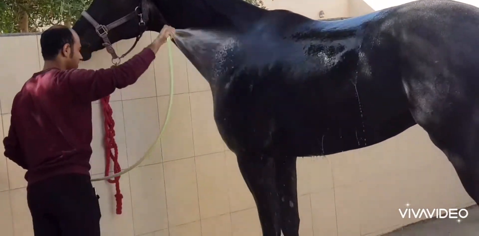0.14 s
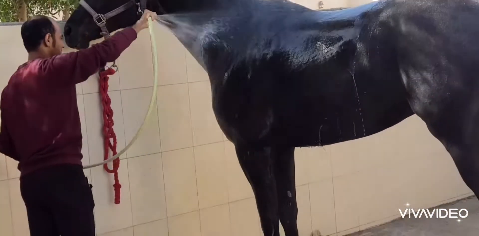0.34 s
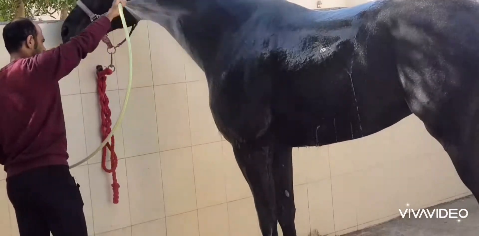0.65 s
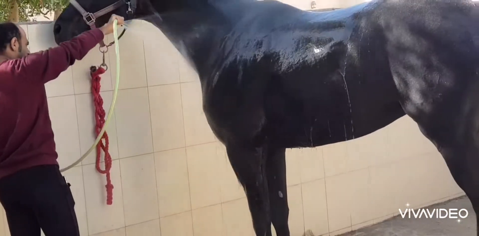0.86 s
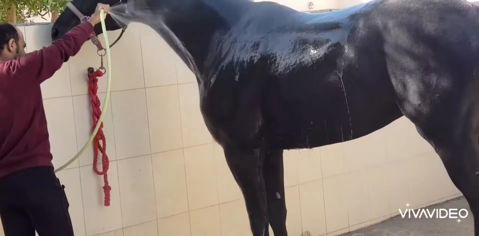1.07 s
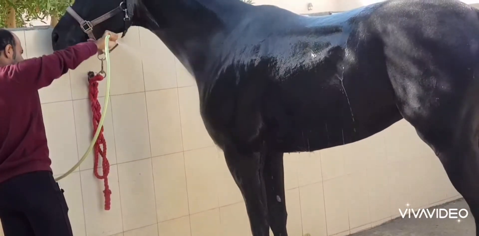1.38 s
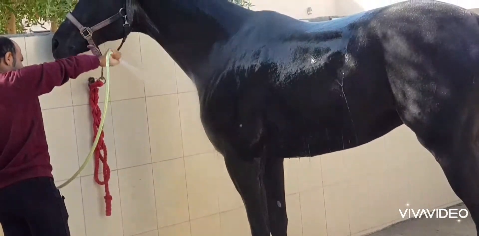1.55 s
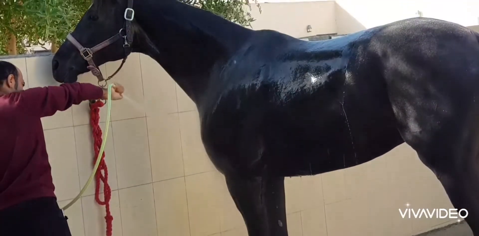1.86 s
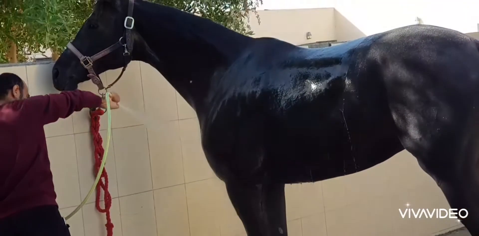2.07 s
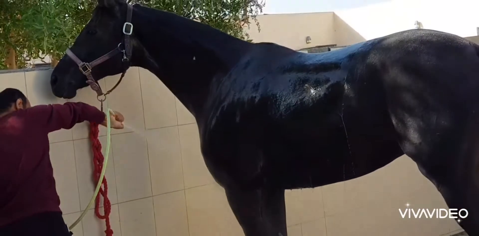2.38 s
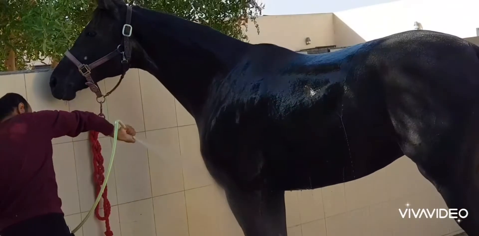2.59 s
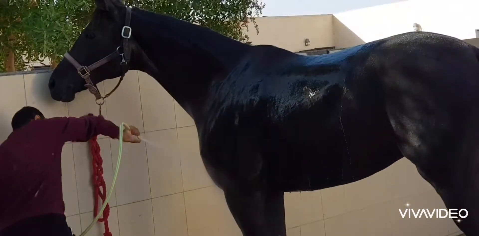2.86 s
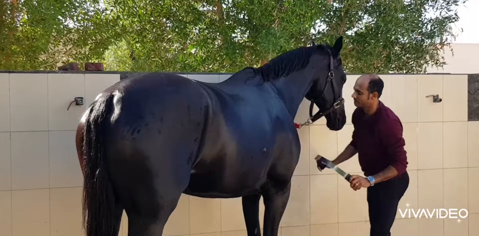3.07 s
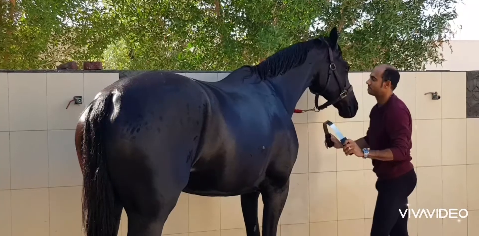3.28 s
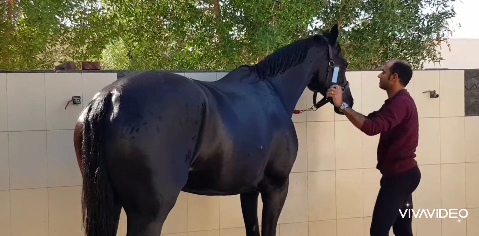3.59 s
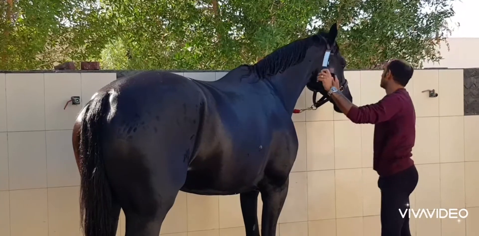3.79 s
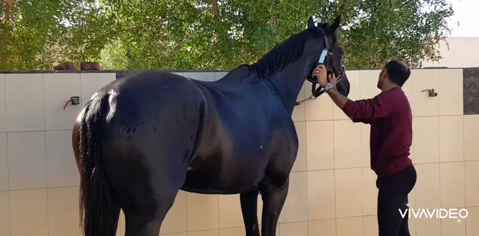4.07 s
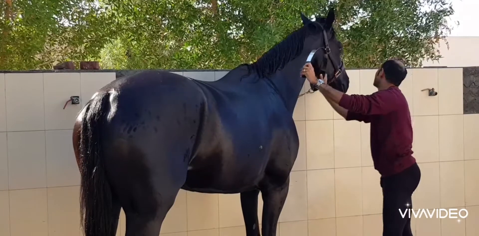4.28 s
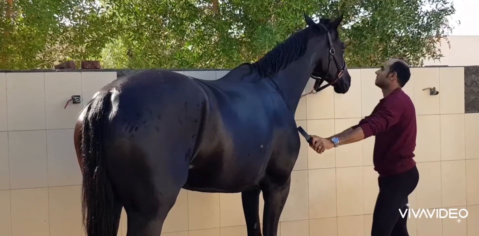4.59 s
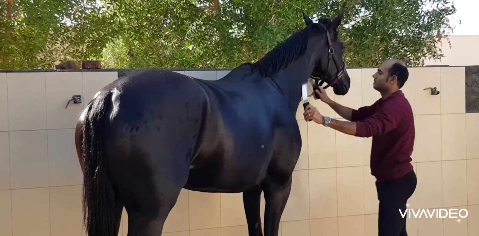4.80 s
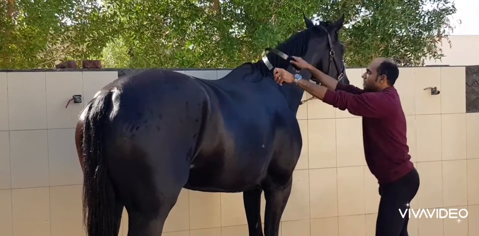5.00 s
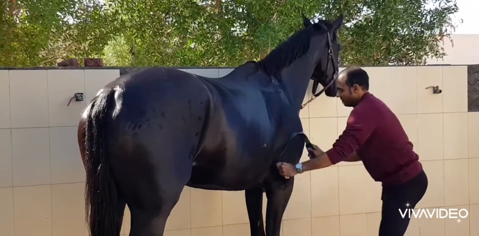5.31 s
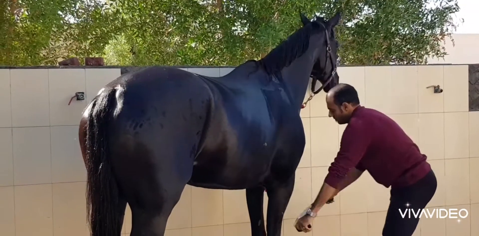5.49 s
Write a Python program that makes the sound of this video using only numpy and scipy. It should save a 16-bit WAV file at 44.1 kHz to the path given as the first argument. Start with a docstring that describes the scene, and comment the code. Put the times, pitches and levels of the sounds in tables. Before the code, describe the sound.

A low hum and soft rumble lie beneath thin air noise and very faint rustling throughout. At 0 s a quick cluster of dull knocks sounds, with weaker taps near 0.2 and 0.5 s. From about 0.5 s a horse gives a rough, low, fluttering nicker with breathy nostril puffs and sharp throat catches near 1.1 and 1.2 s. The voice thins around 1.4 s with a faint nasal whistle, then climbs from 1.6 s into a high, wavering squeal, strongest near 2.1 s, falling away by 2.3 s. A quiet gap follows, with light dry taps around 2.7, 3.2-3.5, 4.0 and 4.5 s. A clearer double knock at 5.15 s precedes a louder, pulsing nicker from 5.25 s, with a raspy higher voice above and a hard catch near 5.45 s, continuing to the end. A hard wall adds one close echo; the yard tail is short.

```python
"""Horse calling in a washing yard

A tethered horse calls twice beside a tiled wall. Its first call is a rough nicker (pulses and breath noise
through throat resonances) that climbs into a wavering squeal (a harmonic series with rasp); the second is a
loud, pulsing nicker with a high voice above it. Light knocks of hooves, halter and grooming tool (filtered
impulses with a noisy ring) fall mostly before and between them, over a low hum, rumble, air and rustling.
The wall gives the voice one close echo; the yard adds a short tail."""
import sys
import numpy as np
from scipy import signal
from scipy.fft import rfft, irfft
from scipy.io import wavfile
from scipy.ndimage import uniform_filter1d, map_coordinates

SR = 44100
rng = np.random.default_rng(int(sys.argv[2]) if len(sys.argv) > 2 else 0)


def waveform_to_disk(signal):
    """Save audio, clipped to [-1, 1], as 16-bit WAV at the path in sys.argv[1]."""
    frames = np.transpose(np.atleast_2d(signal))
    scaled = np.clip(frames, -1, 1) * 32767
    samples = np.round(scaled).astype(np.int16)
    wavfile.write(sys.argv[1], SR, samples)


N = 249165
TIME = np.arange(N) / SR  # seconds


def gain_of(db):
    """Amplitude ratio: 20 dB for each factor of ten."""
    return 10 ** (np.asarray(db) / 20)


def evened(x):
    """Normalisation: scales a signal to rms 1."""
    return x / np.sqrt(np.mean(x ** 2) + 1e-20)


def read(points, hz):
    """Spectral envelope: levels in dB joined by straight lines on a log-frequency axis."""
    f, db = np.transpose(points)
    return np.interp(np.log(hz + 1), np.log(f), db)


def follow(rows, t):
    """Linear interpolation: each column of a curve table at the times t."""
    s, *columns = np.transpose(rows)
    return [np.interp(t, s, c) for c in columns]


def add(mix, s, sound):
    """Superposition: mixes a sound in at s seconds."""
    part = mix[max(round(s * SR), 0):][:len(sound)]
    part += sound[:len(part)]


def colour(x, points):
    """Linear filtering: shapes x by a spectral envelope, to rms 1."""
    hz = np.fft.rfftfreq(len(x), 1 / SR)
    return evened(irfft(rfft(x) * gain_of(read(points, hz)), len(x)))


def band(x, low_hz, high_hz):
    """Band limitation: a steep zero-phase band-pass, to rms 1."""
    hz = np.fft.rfftfreq(len(x), 1 / SR) + 1
    loss = np.sqrt((1 + (low_hz / hz) ** 20) * (1 + (hz / high_hz) ** 20))
    return evened(irfft(rfft(x) / loss, len(x)))


def wander(size, hz):
    """Random modulation: band-limited noise of rms 1, from a tenth of hz up to hz."""
    return band(rng.standard_normal(size), hz / 10, hz)


def causal(db):
    """Minimum phase: the most compact causal pulse with this spectrum, its range limited to 80 dB."""
    log_gain = np.log(gain_of(np.maximum(db, db.max() - 80)))
    circle = np.r_[log_gain, log_gain[-2:0:-1]]
    return np.fft.ifft(np.exp(np.conj(signal.hilbert(circle)))).real


def bump(t, s, half_s):
    """Gaussian envelope: a smooth swell from 0 to 1 and back, centred on s."""
    return np.exp(-((t - s) / half_s) ** 2)


def swells(rows, t):
    """Superposed Gaussian envelopes: the gain of a table of smooth swells at the times t."""
    return sum(gain_of(db) * bump(t, s, half_s) for s, half_s, db in rows)


def hum_and_whine():
    """Frequency and amplitude modulation: steady tones drift slightly in pitch and level."""
    drift_hz, swell_db = 3, 1.5  # rms
    # A low hum and a faint whine. Each row: frequency in hertz, level in dB.
    tones = [(89, -62), (4280, -94.5)]
    mix = np.zeros(N)
    for hz, db in tones:
        swell = gain_of(swell_db * wander(N, 7.6))
        turns = np.cumsum(hz + drift_hz * wander(N, 11.7)) / SR
        mix += gain_of(db) * evened(swell * np.sin(2 * np.pi * turns))
    return mix


def background(rustle_db=-4.0):
    """Filtered noise: rumble, still air, high hiss and soft rustling, together with the hum and whine."""
    rumble_db, rumble_swell_db, rumble_swell_hz = -60, -0.36, 5.5
    air_db = -81
    # Spectrum of the low rumble. Each row: frequency in hertz, relative level in dB.
    rumble_spectrum = [(20, -29.5), (45, -12), (70, -5), (88, 2.5), (125, -0.5), (170, -7), (240, -8),
                       (320, -15), (450, -25.5), (900, -41.5)]
    # Spectrum of the still air. Each row: frequency in hertz, relative level in dB.
    air_spectrum = [(150, -4.5), (300, -6), (500, -3.5), (900, -6.5), (1400, -19.5), (1900, -13.5),
                    (2800, -12.5), (3400, -14), (8000, -21.5), (15500, -48)]
    # Spectrum of the rustle. Each row: frequency in hertz, relative level in dB.
    rustle_spectrum = [(300, -10), (600, 9), (1300, 9.5), (2000, 4.5), (2700, 6.5), (3400, -12.5),
                       (6000, -18.5), (11000, -21), (15000, -21)]
    # Faint rustle of water and grooming. Each row: time in seconds, level in dB before rustle_db is added.
    rustle_levels = [(0.0, -76.5), (2.45, -76), (3.3, -74), (3.55, -79), (3.93, -68.5), (4.2, -74.5),
                     (5.1, -76), (5.25, -57)]
    # A faint high hiss swells twice. Each row: peak time in seconds, half-length in seconds, level in dB.
    hiss_swells = [(3.22, 0.29, -79.5), (4.15, 0.23, -86)]

    rumble_gain = gain_of(rumble_db + rumble_swell_db * wander(N, rumble_swell_hz))
    rumble = rumble_gain * colour(rng.standard_normal(N), rumble_spectrum)
    air = gain_of(air_db) * colour(rng.standard_normal(N), air_spectrum)
    rustle_gain = gain_of(follow(rustle_levels, TIME)[0] + rustle_db + 2.2 * wander(N, 40))
    rustle = rustle_gain * colour(rng.standard_normal(N), rustle_spectrum)
    hiss = swells(hiss_swells, TIME) * band(rng.standard_normal(N), 6800, 14060)
    return rumble + hum_and_whine() + air + hiss + rustle


def knock(peak_db, hz, octaves, t60, body, scatter_db):
    """Impulse response: one blow excites a body around hz, with a rattle that decays 60 dB in t60."""
    f = np.fft.rfftfreq(4096, 1 / SR)
    away = np.log2((f + 1) / hz) / max(octaves, .1)
    blow = causal(read(body, f) - 11 * np.log1p(away ** 2))
    decay = gain_of(-60 * np.arange(len(blow)) / SR / max(t60, .003))
    rattle = rng.standard_normal(len(blow)) * decay
    rattle *= gain_of(scatter_db) / np.linalg.norm(rattle)
    rattle[0] += 1  # the blow itself
    sound = signal.fftconvolve(blow, rattle)
    return gain_of(peak_db) * sound / abs(sound).max()


def yard_knocks():
    """Impact excitation: hooves, halter and grooming tool strike bodies of one common colour; the blow at 0.508
    s, as the first call begins, is a sharp catch of the horse's throat."""
    # Each row: start in seconds, peak in dB, centre in hertz, width in octaves, 60 dB ring in seconds. The row
    # at 0.508 s is a catch of the throat at the first call's onset.
    blows = [(0.001, -34.5, 360, 0.86, 0.063), (0.024, -45.5, 660, 0.21, 0.024),
             (0.031, -39.5, 470, 0.47, 0.11), (0.053, -51.5, 730, 0.21, 0.021),
             (0.058, -40.5, 423, 0.89, 0.013), (0.203, -50.5, 356, 0.66, 0.039),
             (0.444, -53, 804, 0.85, 0.043), (0.471, -48.5, 1010, 5.1, 0.17), (0.508, -43, 875, 1.1, 0.11),
             (1.99, -41.5, 259.4, 0.64, 0.016), (2.736, -56.5, 1498, 0.54, 0.095),
             (3.225, -51, 1153, 0.44, 0.15), (3.256, -60, 1010, 0.25, 0.11), (3.342, -45, 282, 0.99, 0.022),
             (3.48, -43.5, 785, 1.4, .028), (3.493, -42, 912, 0.49, 0.037), (3.502, -51, 951, 0.86, 0.016),
             (4.019, -36.5, 691, 0.49, 0.014), (4.028, -43, 234, 0.65, 0.026),
             (4.132, -59, 2550, 0.2, .035), (4.368, -59, 2500, 0.2, 0.073), (4.526, -40, 820, 1.33, 0.03),
             (4.537, -41, 750, 1.5, 0.082), (4.575, -38.5, 940, 0.58, 0.028),
             (4.577, -54, 1940, 0.059, .05), (4.66, -54, 280, 0.21, 0.034),
             (4.828, -53.5, 1580, 0.48, 0.058), (4.952, -62.5, 886, 0.37, 0.037),
             (5.139, -27.5, 820, 0.98, 0.095), (5.158, -32.5, 815, 0.71, 0.043)]
    # Spectrum of the struck bodies. Each row: frequency in hertz, relative level in dB.
    body = [(80, -11), (200, 12.5), (400, 3.5), (650, -0.5), (920, 0.5), (1200, -5.5), (1550, -12),
            (2000, -9.5), (2650, -4.5), (3300, -35.5), (6000, -27)]
    mix = np.zeros(N)
    for s, *blow in blows:
        add(mix, s, knock(*blow, body, scatter_db=1.5))
    return mix


def nicker(rows, throat, uneven_db=2.0, flutter_hz=45, chest_air=1.0, nostril_air=6.5, sputter_db=3, jitter=.13):
    """Source-filter principle: uneven flaps of the folds and their air ring chest, mouth and nostrils."""
    puff_length, leak = .55, .3  # decay of each flap's air in cycles, and its steady part
    mouth_air = 1.8  # the mouth's share of air, per unit of roughness
    nose_db, puff_half_hz = -32.5, 45  # steady nostril air relative to the mouth; half-width of a puff's band
    full_flutter_db = 2.5  # rms flutter at roughness 1
    # A break's half-length; a surge follows, by a share of its depth.
    break_s, surge_after_s, surge_share = 0.0055, 0.017, 0.24
    # Puffs through the nostrils, before the sputter. Each row: peak time in seconds, half-length in seconds,
    # level in dB, centre in hertz.
    nostril_puffs = [(0.605, 0.058, -58.5, 2930), (0.953, 0.065, -66.5, 2740), (1.038, 0.091, -63.5, 3100),
                     (1.212, 0.04, -62.5, 3100), (1.29, 0.029, -61.5, 2740), (1.35, 0.013, -66, 2720),
                     (5.357, 0.025, -57, 2800), (5.505, 0.013, -56, 3220), (5.6, 0.069, -64, 3100)]
    # Brief breaks in the voice. Each row: time in seconds, depth in dB.
    breaks = [(0.783, 9), (0.833, 20), (1.033, 8.5)]

    t = np.arange(rows[0][0], rows[-1][0], 1 / SR)
    hz, rough, chest_db, mouth_db = follow(rows, t)
    turns = np.cumsum(hz * (1 + jitter * rough * wander(len(t), 70))) / SR
    force = gain_of(uneven_db * rough * wander(len(t), 160))  # rough folds flap strongly, then weakly
    flaps = evened(force * np.diff(np.floor(turns), prepend=0) / np.sqrt(hz))
    flow = leak + np.exp(-(turns % 1) / puff_length)
    breath = evened(flow * rng.standard_normal(len(t)))
    ring = causal(read(throat, np.fft.rfftfreq(2048, 1 / SR)))

    def voiced(air_share, low_hz, high_hz):
        """Resonance: one register of the throat, levelled by its running power."""
        air_share = np.clip(air_share, 0, 1)
        drive = np.sqrt(1 - air_share) * flaps + np.sqrt(air_share) * breath
        x = band(signal.fftconvolve(drive, ring)[:len(t)], low_hz, high_hz)
        return x / np.sqrt(uniform_filter1d(x ** 2, size=1800) + 1e-6)

    chest = gain_of(chest_db) * voiced(rough * chest_air, 100, 705)
    mouth = gain_of(mouth_db) * voiced(rough * mouth_air, 730, 2050)
    nostrils = gain_of(mouth_db + nose_db) * voiced(rough * nostril_air, 3800, 4100)
    for s, half_s, db, centre in nostril_puffs:
        if t[0] < s < t[-1]:
            puff = voiced(rough * nostril_air, centre - puff_half_hz, centre + puff_half_hz)
            nostrils += gain_of(db) * bump(t, s, half_s) * puff
    nostrils *= gain_of(sputter_db * (wander(len(t), 20.4) - sputter_db / 10))  # the nostrils open and shut

    flutter_db = full_flutter_db * rough * wander(len(t), flutter_hz)
    break_db = np.zeros(len(t))
    for s, db in breaks:
        break_db += db * (bump(t, s, break_s) - surge_share * bump(t, s + surge_after_s, break_s))
    attack = np.minimum((t - t[0]) / 0.0041, 1)
    return t[0], (chest + mouth + nostrils) * gain_of(flutter_db - break_db) * attack


def whistle(rows, waver=0.011):
    """Aeolian tone: air sings unsteadily through a narrowed nostril, as a sine of wavering pitch."""
    t = np.arange(rows[0][0], rows[-1][0], 1 / SR)
    hz, level_db = follow(rows, t)
    turns = np.cumsum(hz * (1 + waver * wander(len(t), 92))) / SR
    return t[0], gain_of(level_db) * np.sqrt(2) * np.sin(2 * np.pi * turns)


def squeal(rows, shimmer=0.22, rasp_db=-7, fall_db=5.5, tense_hz=1100, flicker_db=2.5, harmonics=7):
    """Harmonic series: tense folds give a high tone, with more overtones and roughness in each sag."""
    attack_s, release_s = 0.0089, 0.023
    sag_loss_db = 9  # the voice is weaker in each sag
    # The waver: the pitch sags ever more slowly, and the last sag ends the first call. Each row: time in
    # seconds, share of the pitch lost, half-length in seconds, added overtones in dB, added roughness (0-1).
    sag_rows = [(1.742, .13, .018, 14, 0.2), (1.815, 0.0562, 0.015, 22, 0.22),
                (1.905, .056, 0.025, 9, 0.15), (2.007, 0.062, 0.025, 15.5, 0.15),
                (2.115, 0.14, 0.025, 11.5, 0.3), (2.255, 0.66, 0.037, 12.5, 0.7)]
    # Throat of the high voice. Each row: frequency in hertz, relative level in dB.
    high_throat = [(400, 9), (900, -6), (1200, -1.5), (1450, -16.5), (2000, -13.5), (2350, -20), (2950, -9),
                   (3350, -16), (3600, -21.5), (4300, -15.5), (4800, -25.5), (6500, -50.5)]
    # Spectrum of its air noise. Each row: frequency in hertz, relative level in dB.
    rasp_spectrum = [(150, -11.5), (300, -9.5), (700, -7), (1200, 4), (2200, -4), (3000, -10), (4000, -29),
                     (5000, -17.5), (8000, -61)]

    t = np.arange(rows[0][0], rows[-1][0], 1 / SR)
    hz, level_db, overtones_db, rough = follow(rows, t)
    sag_s, sag_share, sag_half_s, sag_overtones_db, sag_rough = np.transpose(sag_rows)
    sags = bump(t[:, None], sag_s, sag_half_s)
    hz = uniform_filter1d(hz, size=600)  # the folds cannot turn a sharp corner
    hz = hz * (1 - np.minimum(sags @ sag_share, .9))
    rough = rough + sags @ sag_rough
    turns = np.cumsum(hz * (1 + .04 * rough * wander(len(t), 220))) / SR

    k = np.arange(1, harmonics + 1)[:, None]
    flicker = np.array([wander(len(t), 90) for _ in k])
    overtones_db = overtones_db + sags @ sag_overtones_db + flicker_db * flicker
    slope_db = fall_db * k * tense_hz / hz  # tense folds sound brighter
    heights = gain_of(read(high_throat, k * hz) + (k > 1) * overtones_db - slope_db)
    tone = (heights * np.sin(2 * np.pi * k * turns)).sum(0)
    tone /= np.sqrt((heights ** 2).sum(0) / 2)
    tone *= 1 + shimmer * rough * wander(len(t), 170)
    rasp = gain_of(rasp_db) * rough * colour(rng.standard_normal(len(t)), rasp_spectrum)
    attack = np.minimum((t - t[0]) / attack_s, 1)
    release = np.minimum((t[-1] - t) / release_s, 1) ** 2
    level = gain_of(level_db - sag_loss_db * sags.sum(1))
    return t[0], attack * release * level * (tone + rasp)


def horse():
    """Superposition of registers: nicker, whistle, squeal and sharp catches of the throat."""
    # The low voice, one table a call. Each row: time in seconds, pulse rate in hertz, roughness (0-1),
    # chest level in dB, mouth level in dB, both before flutter and breaks.
    low_calls = [
        [(0.52, 76.27, .7, -50, -55), (0.538, 77.12, 0.55, -38, -53.5), (0.68, 79.85, 0.51, -38, -49),
         (0.86, 72.34, 0.29, -38, -52), (0.98, 75.83, 0.28, -41.5, -50), (1.12, 70.76, 0.44, -38, -45.5),
         (1.28, 75.45, 0.46, -43, -49.5), (1.31, 145.9, 0.09, -41, -52.5), (1.46, 126.6, 0.13, -53, -64.5),
         (1.575, 147.4, 0.04, -45.5, -54.5), (1.592, 152.2, 0.24, -53.5, -49), (1.655, 178.6, 0.2, -43, -48),
         (1.705, 210, 0, -51, -62), (1.745, 227, .1, -63, -66)],
        [(5.29, 68.9, 0.3, -50, -44.5), (5.312, 69.93, 0.36, -35, -38), (5.34, 70.3, 0.5, -32, -36.5),
         (5.46, 70.68, 0.41, -30.5, -35.5), (5.54, 72.12, 0.22, -33, -40.5), (5.65, 77.3, 0.29, -29.5, -32)],
    ]
    # The throat, one table a call. Each row: frequency in hertz, relative level in dB.
    throats = [
        [(53, -69), (90, -26), (198, 11.5), (251, 5.5), (312, 9), (363, 8.5), (415, 6), (483, 7), (748, -20),
         (1140, -15), (1350, -15.5), (2310, -46), (2730, -22), (3450, -53), (5000, -49), (6500, -79),
         (11000, -120)],
        [(53, -83), (90, -30), (205, 5), (307, -0.5), (357, 2), (460, 2.5), (582, -3), (676, -20), (1140, -11),
         (1650, -20), (1890, -25), (2120, -36), (2780, -9.5), (3510, -37), (5000, -42), (6500, -83),
         (11000, -120)],
    ]
    # The high voice, one table a call. Each row: time in seconds, pitch in hertz, level in dB,
    # overtones in dB, roughness (0-1), all but the time before the sags.
    high_calls = [
        [(1.578, 458, -40, 17, .08), (1.648, 451, -37, 15, .08), (1.672, 525, -37, 10, 0.02),
         (1.71, 651.4, -37.5, 14.5, 0.2), (1.785, 967, -35, -3, 0.23), (1.865, 1146, -29, -2, .15),
         (1.955, 1194, -28, -1, 0.14), (2.06, 1203, -24, 0.5, 0.14), (2.17, 1205, -25.5, -2.5, 0.08),
         (2.27, 1186, -31.5, 12, 0.14)],
        [(5.24, 369.2, -61, -8, 0.3), (5.265, 390, -35, 14, 0.3), (5.295, 487.7, -38.5, 17, 0.4),
         (5.315, 551.4, -30, -11, 0.04), (5.36, 593, -33, -7, 0.18), (5.42, 612, -32.5, 4, 0.34),
         (5.46, 560, -38.5, 20, 0.1), (5.54, 577, -47, 4.5, 0.64), (5.65, 600, -35.5, 29, 0.3)],
    ]
    # Thin nostril whistles, one table a call. Each row: time in seconds, pitch in hertz, level in dB.
    whistles = [
        [(1.28, 1700, -98), (1.34, 1750, -58), (1.38, 1765, -77), (1.42, 1785, -53.5), (1.47, 1820, -87),
         (1.54, 1820, -56.5), (1.58, 1920, -87)],
        [(5.26, 1700, -53), (5.295, 1820, -51.5), (5.32, 1830, -66), (5.365, 1855, -41), (5.4, 1845, -55),
         (5.43, 1820, -68)],
    ]
    # Sharp catches of the throat. Each row: start in seconds, peak in dB, centre in hertz,
    # width in octaves, 60 dB ring in seconds.
    catches = [(1.091, -23, 1210, 0.44, 0.014), (1.211, -30, 1100, 0.97, 0.011),
               (1.223, -25.5, 1230, 0.65, 0.014), (5.456, -17, 1170, 0.61, 0.013),
               (5.612, -28, 1090, 0.61, 0.025)]
    voice = np.zeros(N)
    for rows, throat in zip(low_calls, throats):
        add(voice, *nicker(rows, throat))
    for rows in high_calls:
        add(voice, *squeal(rows))
    for rows in whistles:
        add(voice, *whistle(rows))
    for s, *blow in catches:
        add(voice, s, knock(*blow, throats[0], scatter_db=-43))
    return voice


def wall(x, strength):
    """Comb filtering: one close echo makes the squeal swell and sink as its pitch wavers."""
    # The echo's path as the head moves. Each row: time in seconds, delay in milliseconds.
    delays = [(0.55, 6.3), (0.85, 5.8), (1.85, 5.76), (2.03, 5.88), (5.33, 5.56), (5.65, 5.15)]
    delay_ms, = follow(delays, TIME)
    echo = map_coordinates(x, [(TIME - delay_ms / 1000) * SR], order=1)
    return (x + strength * echo) / np.sqrt(1 + strength ** 2)


def yard(x, t60=0.12, wet_db=-19, far_s=0.084, far_db=-41):
    """Reverberation: a short, thin tail from the ground, and a faint, blurred echo from the far wall."""
    t = TIME[:SR // 2]
    tail = rng.standard_normal(len(t)) * (t > .008) * np.exp(-np.log(1000) * t / t60)
    wet = signal.fftconvolve(x, tail / np.linalg.norm(tail))[:N]
    far = np.interp(TIME - far_s, TIME, wet, left=0)
    return x + gain_of(wet_db) * wet + gain_of(far_db) * far


def scene():
    """Superposition: the echoed voice and the knocks in the yard, over the background, alike in both ears."""
    sources = wall(horse(), strength=0.51) + yard_knocks()
    return np.tile(yard(sources) + background(), (2, 1))


def record(dry):
    """Sample-and-hold aliasing: a slower clock folds a faint fizz into the treble; a low-pass follows."""
    hold_hz, edge_hz = 32000, 15580
    held_at = np.round(np.arange(N) * hold_hz / SR) * SR / hold_hz  # nearest tick, in samples
    held = np.array([map_coordinates(x, [held_at], order=3, mode="nearest") for x in dry])
    low_pass = signal.firwin(511, edge_hz, window=("kaiser", 9), fs=SR)
    return signal.oaconvolve(held, low_pass[None], "same")


dry = scene()
out = record(dry)
waveform_to_disk(out)
```